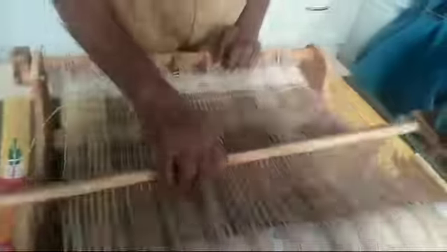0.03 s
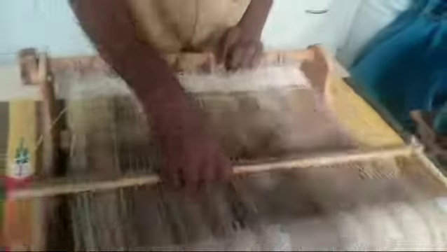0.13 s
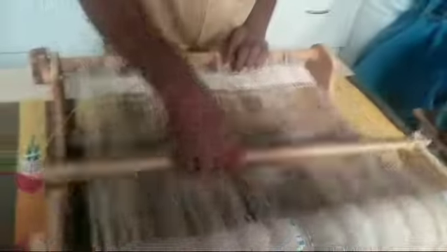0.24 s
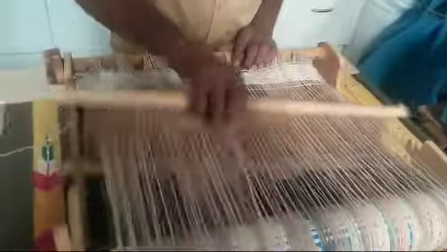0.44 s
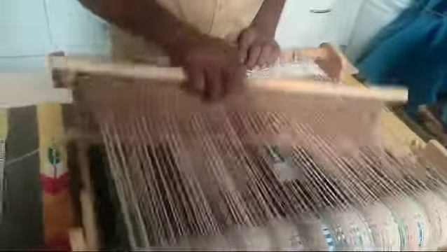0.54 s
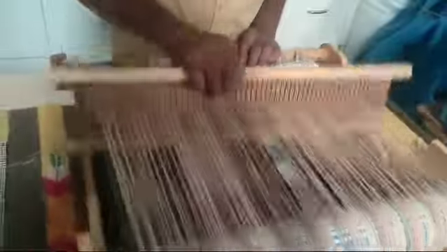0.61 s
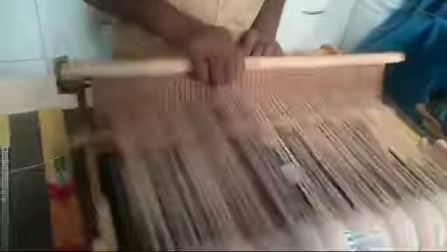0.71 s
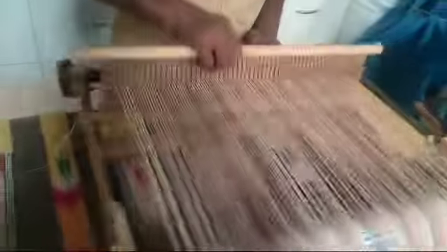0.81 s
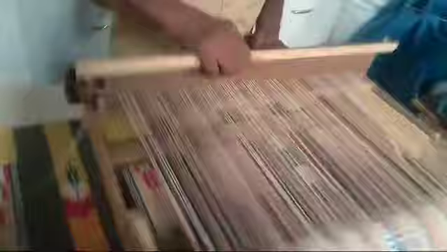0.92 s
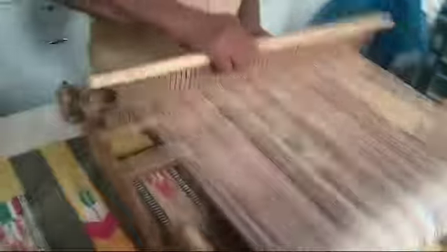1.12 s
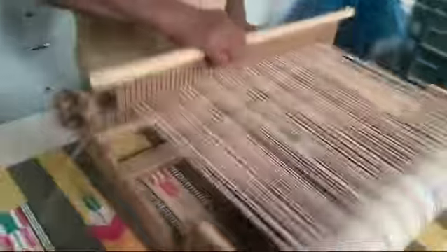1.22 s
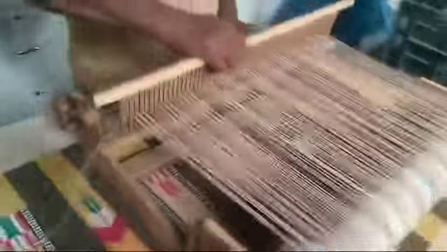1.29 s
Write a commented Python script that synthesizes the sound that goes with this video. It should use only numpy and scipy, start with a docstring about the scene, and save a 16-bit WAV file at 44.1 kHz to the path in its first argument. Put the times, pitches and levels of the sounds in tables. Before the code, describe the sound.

A hand loom's wooden bar knocks, and its reed swishes along the threads.

```python
"""A hand loom in a small, quiet room, heard from close by on a small stereo microphone.
Over faint room tone the reed slides lightly along the warp threads. The wooden bar knocks hard against
the frame and the reed clacks in its slot. The reed then swishes to and fro about three times a second,
with a few soft bumps as the hands move the bar. A second, duller knock falls at about one second."""
import sys
import numpy as np
from scipy import signal
from scipy.fft import rfft, irfft, next_fast_len
from scipy.io import wavfile

SR = 44100
rng = np.random.default_rng(int(sys.argv[2]) if len(sys.argv) > 2 else 0)


def to_wav(s):
    """Save 16-bit WAV."""
    ch = np.atleast_2d(s).T  # columns
    pcm = np.round(np.clip(ch, -1, 1) * 32767)  # PCM
    wavfile.write(sys.argv[1], SR, pcm.astype(np.int16))


N = 59535
TIME = np.arange(N) / SR

# likeness of the room's sound at left and right (frequency [Hz], likeness [-1..1])
ROOM_LIKENESS = [(150, 0.96), (300, 0.95), (600, 1), (1100, 0.04), (3000, 0.042), (10000, 0.081)]


def amp(db):
    """Decibels to gain."""
    return 10 ** (np.asarray(db) / 20)


def unit(x):
    """Scaled to rms 1."""
    return x / np.sqrt(np.mean(x ** 2) + 1e-20)


def along(points, hz):
    """(frequency, value) points read on a log axis."""
    point_hz, values = np.transpose(points)
    return np.interp(np.log(hz + 1), np.log(point_hz + 1), values)


def filtered(x, gain):
    """Minimum-phase filter with the given gain over frequency."""
    size = 2 * next_fast_len(N)
    hz = np.fft.rfftfreq(size, 1 / SR)
    cepstrum = irfft(np.log(np.maximum(gain(hz), 1e-6)), size)
    cepstrum[1:size // 2] *= 2
    cepstrum[size // 2 + 1:] = 0
    return irfft(rfft(x, size) * np.exp(rfft(cepstrum)), size)[..., :N]


def coloured(x, curve):
    """x shaped by a curve of (frequency [Hz], gain [dB])."""
    return filtered(x, lambda hz: amp(along(curve, hz)))


def dulled(x, cut_hz, order=4.8):
    """A steep low-pass: the softness of a contact."""
    return filtered(x, lambda hz: (1 + (hz / cut_hz) ** (2 * order)) ** -0.5)


def spread(pair, likeness):
    """Two unrelated signals to left and right with the given likeness over frequency."""
    hz = np.fft.rfftfreq(N, 1 / SR)
    turn = np.arccos(np.clip(likeness(hz), -1, 1)) / 2
    mid, side = irfft(rfft(pair) * [np.cos(turn), np.sin(turn)], N)
    return np.array([mid + side, mid - side])


def pan(db):
    """Left and right gains, the left louder by db."""
    return amp([[db / 2], [-db / 2]])


def fade(t60, time=TIME):
    """A decay of 60 dB in t60 seconds."""
    return np.exp(-np.log(1000) * time / t60)


def at(start, x):
    """x delayed by start seconds."""
    return np.pad(x, [(0, 0), (max(round(start * SR), 0), 0)])[:, :N]


def ring(modes, pitch, length):
    """Struck modes die quickly and leave a faint after-ring; pitch scales frequency, length decay time."""
    after_ring = fade(0.3 * length)
    out = np.zeros((2, N))
    for hz, db, t60, side_db, after_db in modes:
        envelope = amp(db) * fade(t60 * length) + amp(after_db) * after_ring
        out += pan(side_db) * envelope * np.sin(2 * np.pi * hz * pitch * TIME)
    return out


def room(x):
    """The small room's answer: close walls first, then a diffuse tail."""
    # decay of the tail (frequency [Hz], t60 [s])
    decay = [(80, 0.14), (200, 0.58), (450, 0.31), (1000, 0.47), (2800, 0.36), (6000, 0.48), (12000, 0.18)]
    # colour of the reflections (frequency [Hz], gain [dB])
    colour = [(60, 4.5), (200, -7.5), (450, 5.5), (800, -1), (1150, 0.5), (2500, 7.5), (6000, 2),
              (12000, 6)]
    hz, time, noise = signal.stft(rng.standard_normal((2, N)), SR, nperseg=256)
    early = amp(-3) * fade(0.091, time)
    diffuse = fade(along(decay, hz)[:, None], time)
    tail = signal.istft(noise * (early + diffuse), SR, nperseg=256)[1][:, :N]
    onset = 1 - np.exp(-(TIME / 0.002) ** 2)
    tail = spread(tail * onset, lambda hz: along(ROOM_LIKENESS, hz))
    tail = coloured(unit(tail) / np.sqrt(N), colour)
    return signal.fftconvolve(np.atleast_2d(x), tail, axes=1)[:, :N]


def room_tone():
    """The faint, steady background of the room."""
    # spectrum of the background (frequency [Hz], relative level [dB])
    colour = [(25, -13.5), (80, -8.5), (170, -3), (300, -5), (600, -6.5), (820, 0), (1300, -8), (2500, -17),
              (4200, -8.5), (6200, -11), (7200, -6.5), (8500, -25.5), (15000, -16.5)]
    air = spread(rng.standard_normal((2, N)), lambda hz: along(ROOM_LIKENESS, hz))
    return amp(-67.5) * unit(coloured(air, colour))


def frame_bumps(rise_s=0.0027, room_db=-7):
    """Low, soft thuds of the whole frame as the hands move the bar, each one damped tone."""
    # thuds (time [s], level [dB], pitch [Hz], t60 [s])
    bumps = [(0.252, -41, 83, 0.32), (.546, -59.5, 152, 0.37), (.548, -56, 450, .05),
             (0.636, -56, 179, 0.25), (0.639, -58.5, 77.5, 0.45), (.885, -58.5, 165, 0.24),
             (0.947, -51, 187, .1), (1.007, -50, 125, 0.044), (1.021, -46, 59.8, 0.28),
             (1.262, -51, 375, .06), (1.322, -30, 148, 0.027), (1.335, -39, 135, 0.18)]
    attack = 1 - np.exp(-TIME / rise_s)
    out = np.zeros((1, N))
    for start, db, hz, t60 in bumps:
        thud = attack * fade(t60) * np.sin(2 * np.pi * hz * TIME)
        out += amp(db) * at(start, thud[None])
    return out + amp(room_db) * room(out)


def rubbing(strokes, colour, catches_per_s=2500, catch_share=0.35, likeness=0.27, room_db=-15.5):
    """Threads slip through the reed: dense tiny catches on a hiss, swelling with each stroke."""
    catches = rng.standard_normal((2, N)) * (rng.random(N) < catches_per_s / SR)
    hiss = rng.standard_normal((2, N))
    slip = np.sqrt(catch_share) * unit(catches) + np.sqrt(1 - catch_share) * hiss
    slip = spread(slip, lambda hz: np.full_like(hz, likeness))
    slip = unit(coloured(slip, colour))
    speed = np.zeros((2, N))
    for peak, db, rise, fall, side_db in strokes:
        from_peak = (TIME - peak) / np.where(TIME < peak, rise, fall)
        speed += amp(db) * pan(side_db) / np.cosh(2 * np.clip(from_peak, -20, 20))
    swish = slip * speed
    return swish + amp(room_db) * room(swish)


def reed_returns():
    """The reed slides back along the warp, slowly and lightly."""
    # back strokes (peak time [s], level [dB], rise [s], fall [s], left-right [dB])
    strokes = [(-.02, -58.5, .05, 0.031, -7), (.225, -50.5, 0.047, 0.12, -4.5),
               (.478, -54.5, 0.12, 0.053, -3.5), (.79, -58.5, 0.055, 0.046, 0),
               (.848, -58.5, 0.05, 0.03, -2.5), (1.118, -51.5, 0.055, 0.071, -2.5)]
    # spectrum of light rubbing (frequency [Hz], relative level [dB])
    colour = [(60, -18), (170, -3), (600, -7.5), (1000, -7), (1850, -6.5), (2250, -5.5), (2850, -11),
              (3700, -2), (3980, 5.5), (4450, 1), (5800, -3), (6400, -6), (7200, -1.5), (8200, -16.5)]
    return rubbing(strokes, colour)


def reed_pushes():
    """The reed is pushed along the warp, quickly and firmly."""
    # forward strokes (peak time [s], level [dB], rise [s], fall [s], left-right [dB])
    strokes = [(.626, -43.5, 0.041, 0.029, 0), (.958, -44, 0.036, 0.03, 0),
               (1.262, -44.5, 0.025, 0.037, 0.5)]
    # spectrum of firm rubbing (frequency [Hz], relative level [dB])
    colour = [(60, -4.5), (170, -15), (380, -4), (650, -11), (1030, -1.5), (1850, -11.5), (2250, -5),
              (2780, -15.5), (3200, -3.5), (3700, -7), (3950, 5.5), (4400, -5.5), (5800, -6), (6400, -13),
              (7100, -5), (8200, -20.5)]
    return rubbing(strokes, colour)


def reed_clacks(room_db=-10.5):
    """The reed rattles briefly in its slot just after the hard knock."""
    # hits in the slot (time [s], level [dB], left-right [dB])
    clacks = [(0.236, -19.5, 3), (0.2384, -23, 9), (.2396, -24, 1)]
    # modes of the reed (base frequency [Hz], level [dB], base t60 [s], left-right [dB], after-ring [dB])
    reed_modes = [(2410, -27, 0.027, 3, -57), (4100, -9.5, 0.043, -3.5, -41), (5330, -9, 0.03, 4, -36.5),
                  (5880, 4, .034, -2, -27), (6010, -18, 0.022, -3.5, -32), (6000, -19, 0.023, -4, -41),
                  (6850, -20.5, 0.017, -4, -43.5), (12120, -13.5, .02, -2, -50.5),
                  (14500, -30.5, .012, -3, -63.5)]
    ringing = ring(reed_modes, pitch=0.96, length=0.46)
    out = np.zeros((2, N))
    for start, db, side_db in clacks:
        snap = amp(1) * dulled(fade(0.017) * rng.standard_normal((2, N)), cut_hz=7200)
        out += amp(db) * pan(side_db) * at(start, ringing + snap)
    return out + amp(room_db) * room(out)


def bar_knocks(rise_s=0.001):
    """The bar meets the frame: damped wooden modes, duller for a soft contact, and the bar's dry tick."""
    # contacts; where the frame is struck sets its pitch
    # (time [s], level [dB], cut-off [Hz], pitch [ratio], ring length [ratio], tick [dB], room send [dB])
    contacts = [(.2278, -13.5, 2360, 1.285, 0.51, -21, -6), (0.2298, -8, 1480, 0.97, 0.86, -34.5, -6),
                (.5475, -45, 1280, 1.25, .4, -70, -3), (0.893, -56, 1100, 1.1, 0.53, -72, -19),
                (1.0221, -18, 880, .9, 0.91, -42.5, -6), (1.3152, -43, 1100, 0.95, 0.77, -75.5, -6)]
    # modes of the frame (base frequency [Hz], level [dB], base t60 [s], left-right [dB], after-ring [dB])
    frame_modes = [(162.6, -20, 0.12, -2.5, -40), (198.6, -9.5, 0.069, 0, -54.5),
                   (345, -31, 0.14, 3.5, -46), (455, -15.5, .06, 7.5, -56.5), (729, -11.5, 0.051, 3, -41.5),
                   (789, -4.5, 0.043, -1.5, -31), (854, -1, 0.028, 4, -40), (1045.4, -11.5, 0.045, 8, -37),
                   (1109, -17.5, 0.037, 7.5, -43), (1167, -20, 0.052, 8, -49),
                   (1550, -19.5, 0.039, -6, -45)]
    # high modes of the bar (columns and units as for the frame)
    bar_modes = [(2640, -10.5, 0.015, -1, -37), (2764, -4.5, 0.01, -10, -39),
                 (3178, -6.5, 0.0083, -13, -38), (4115, -9, 0.015, -2.5, -39.5),
                 (6550, -10.5, 0.0027, -4.5, -48)]
    # how well the frame radiates (frequency [Hz], gain [dB])
    radiation = [(30, -6.5), (120, -7), (200, 2.5), (300, -1), (560, -7), (760, -1.5), (1100, 3.5),
                 (1600, 3), (2000, -7.5)]
    attack = 1 - np.exp(-TIME / rise_s)
    bar_ring = attack * ring(bar_modes, pitch=0.98, length=0.87)
    out = np.zeros((2, N))
    for start, db, cut_hz, pitch, length, tick_db, room_db in contacts:
        crack = amp(-17) * fade(0.036) * rng.standard_normal(N)
        body = coloured(attack * ring(frame_modes, pitch, length) + crack, radiation)
        tick = bar_ring + amp(-28.5) * fade(0.005) * rng.standard_normal(N)
        blow = amp(db) * dulled(body, cut_hz) + amp(tick_db) * tick
        out += at(start, blow + amp(room_db) * room(blow.mean(axis=0)))
    return out


def scene():
    """The loom close by, the quiet room behind it."""
    return bar_knocks() + reed_clacks() + frame_bumps() + reed_pushes() + reed_returns() + room_tone()


def record(dry, top_hz=15500):
    """A small microphone, weak above 8 kHz, with a hard band limit."""
    # microphone response (frequency [Hz], gain [dB])
    response = [(20, -18.5), (60, 1), (7200, -1.5), (8100, -5.5), (9000, -24), (10000, -13), (15000, -13.5)]
    heard = coloured(dry, response)
    in_band = np.fft.rfftfreq(2 * N, 1 / SR) < top_hz
    return irfft(rfft(heard, 2 * N) * in_band)[:, :N]


dry = scene()
out = record(dry)
to_wav(out)
```